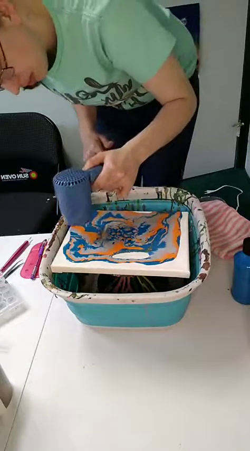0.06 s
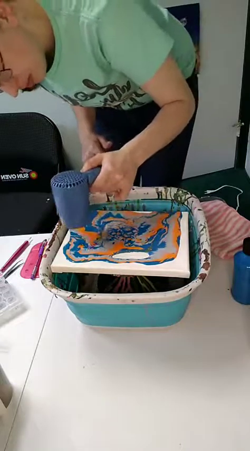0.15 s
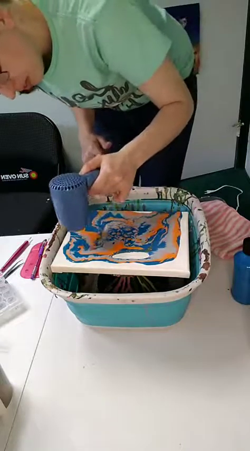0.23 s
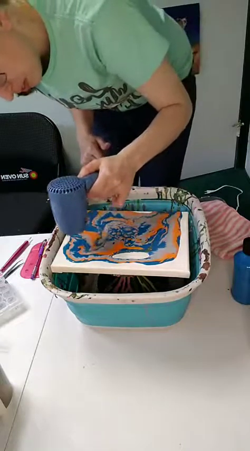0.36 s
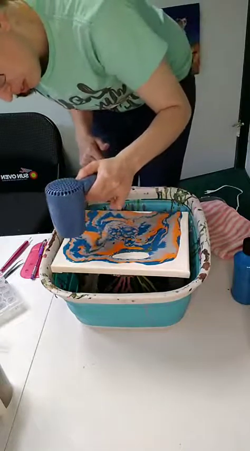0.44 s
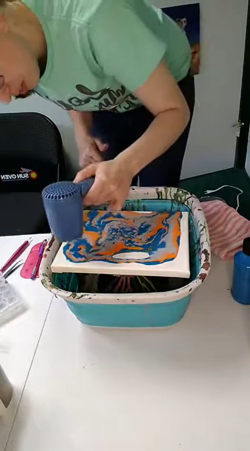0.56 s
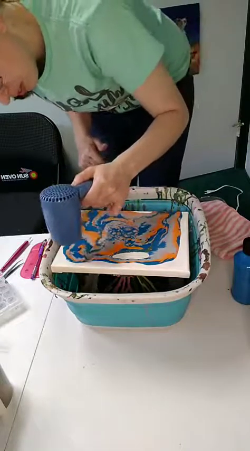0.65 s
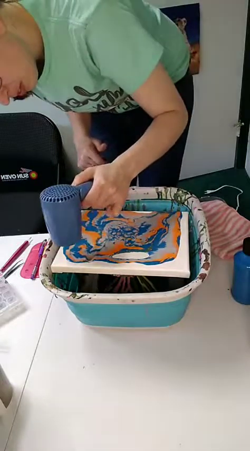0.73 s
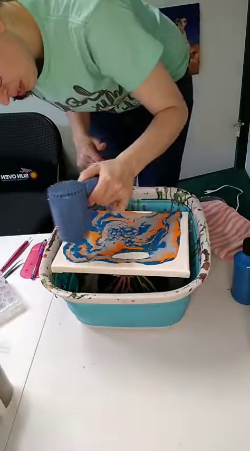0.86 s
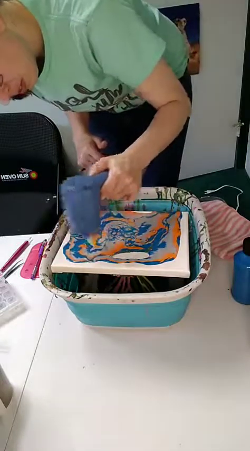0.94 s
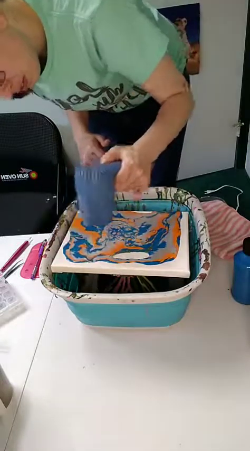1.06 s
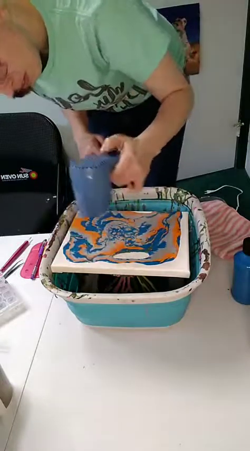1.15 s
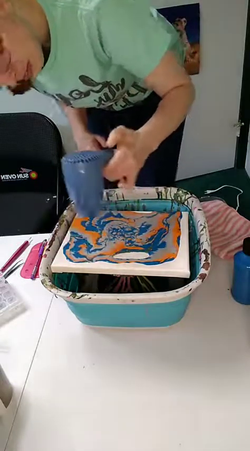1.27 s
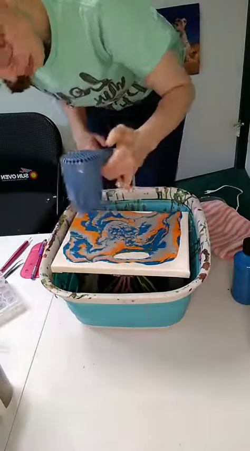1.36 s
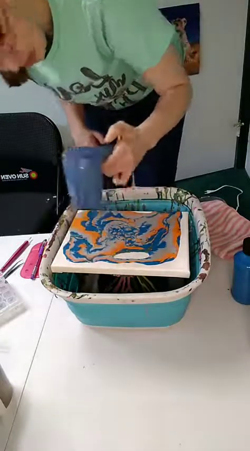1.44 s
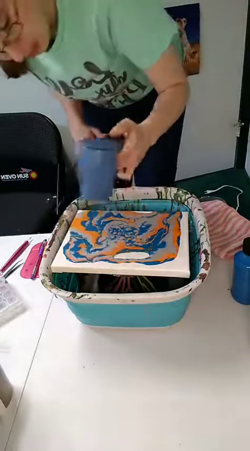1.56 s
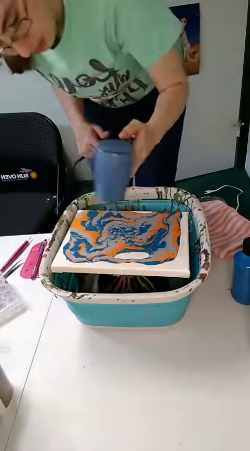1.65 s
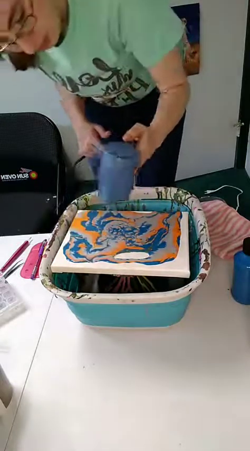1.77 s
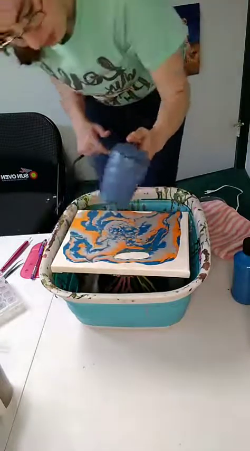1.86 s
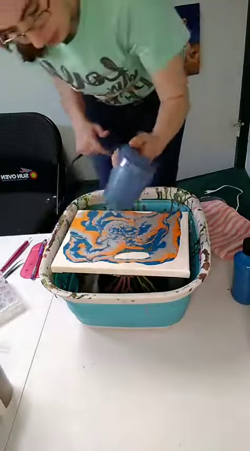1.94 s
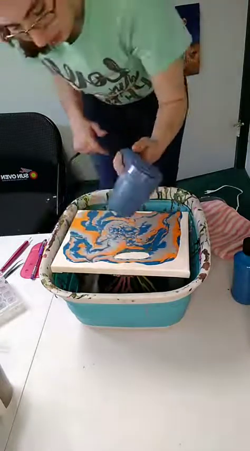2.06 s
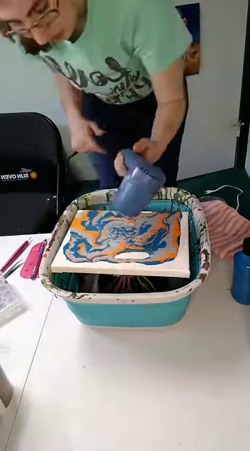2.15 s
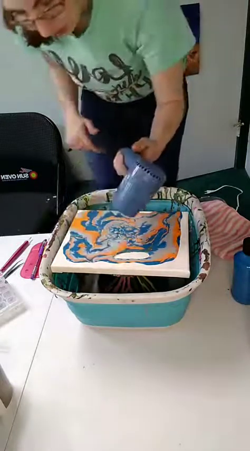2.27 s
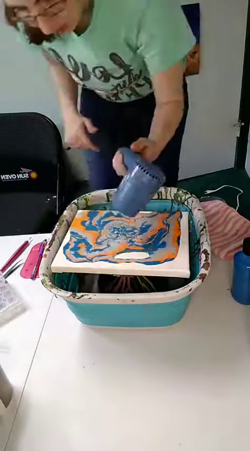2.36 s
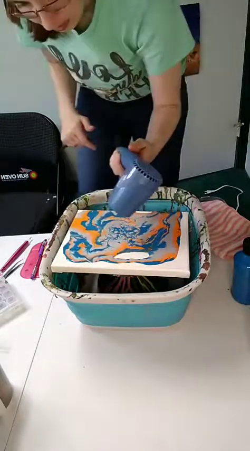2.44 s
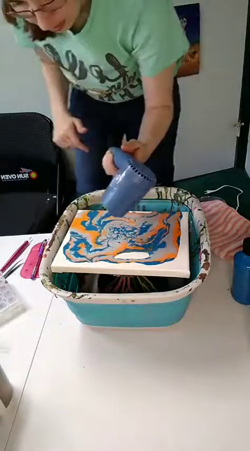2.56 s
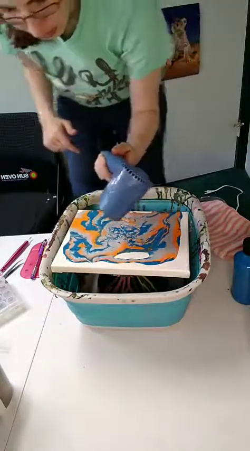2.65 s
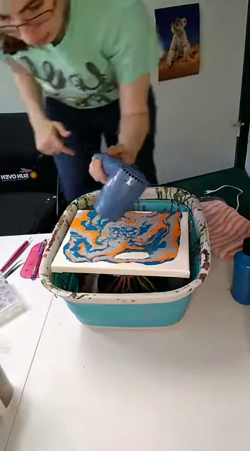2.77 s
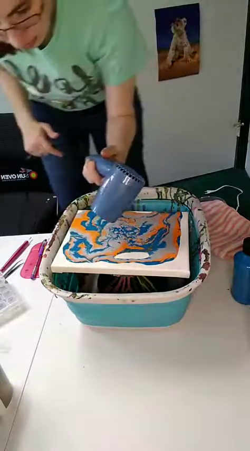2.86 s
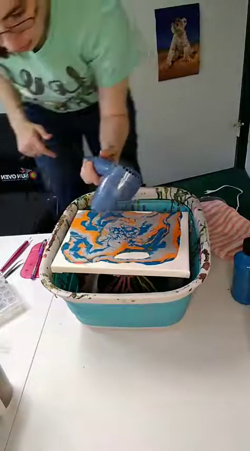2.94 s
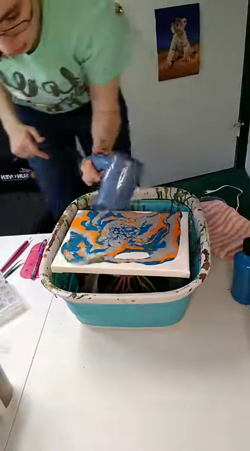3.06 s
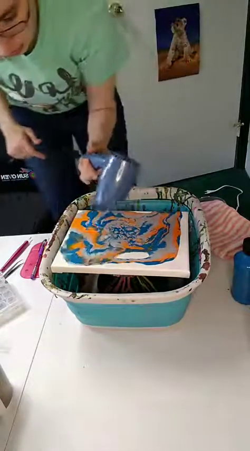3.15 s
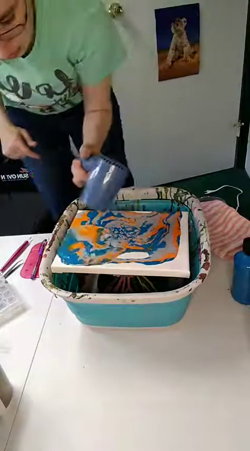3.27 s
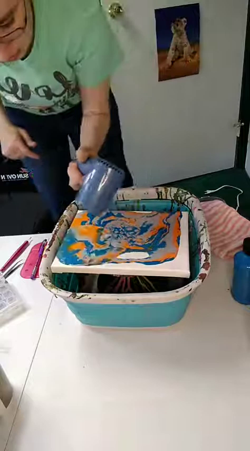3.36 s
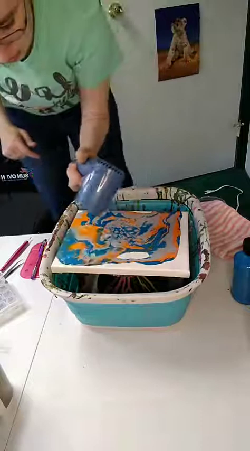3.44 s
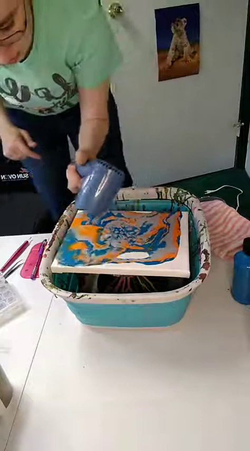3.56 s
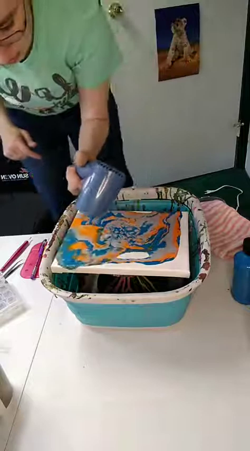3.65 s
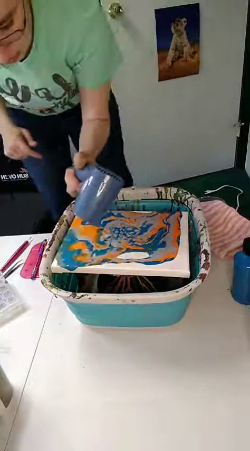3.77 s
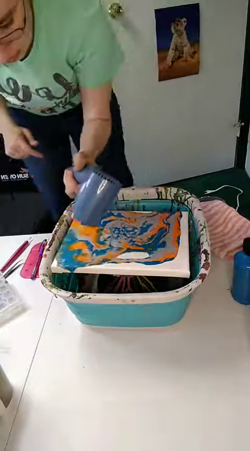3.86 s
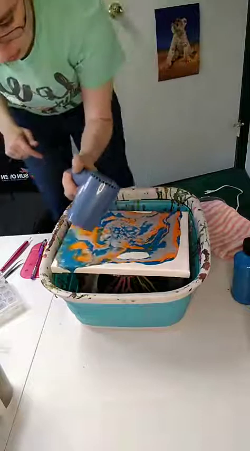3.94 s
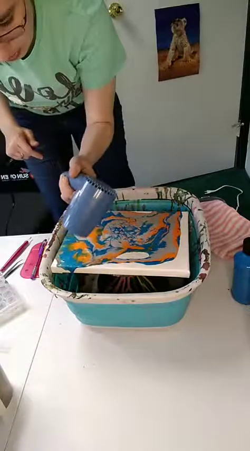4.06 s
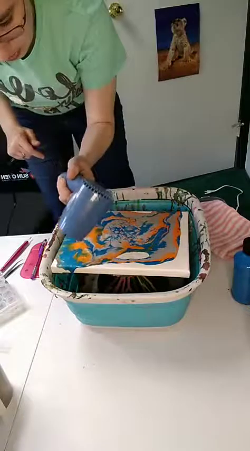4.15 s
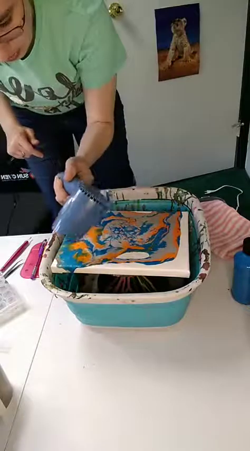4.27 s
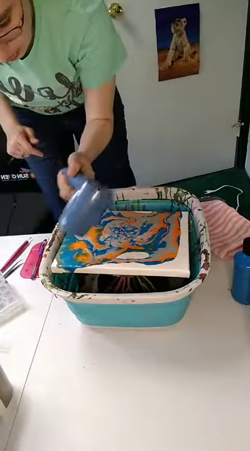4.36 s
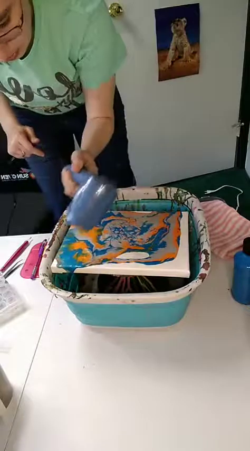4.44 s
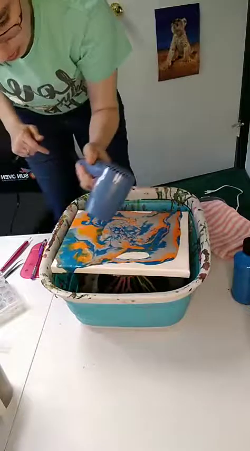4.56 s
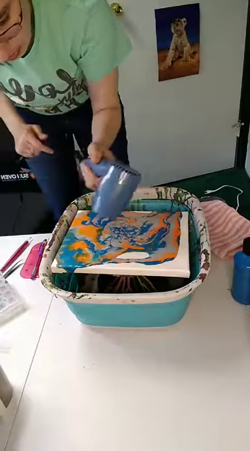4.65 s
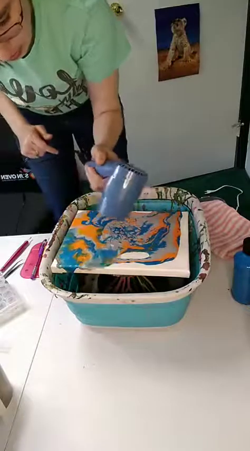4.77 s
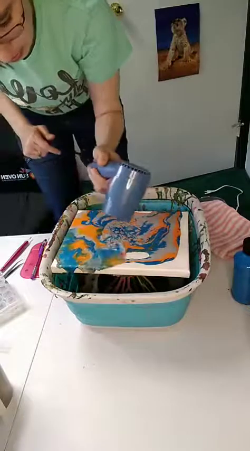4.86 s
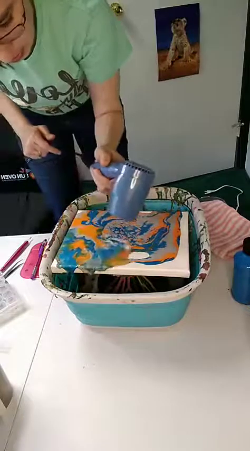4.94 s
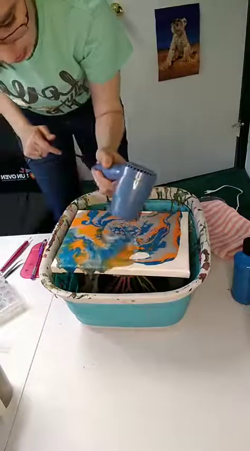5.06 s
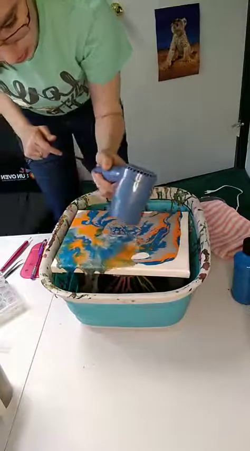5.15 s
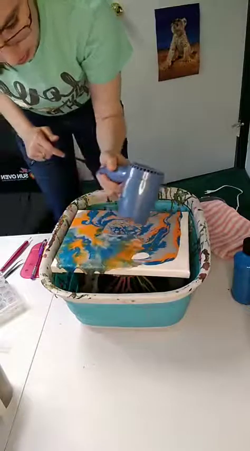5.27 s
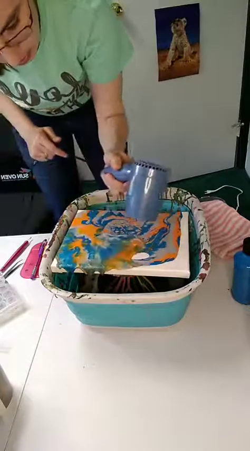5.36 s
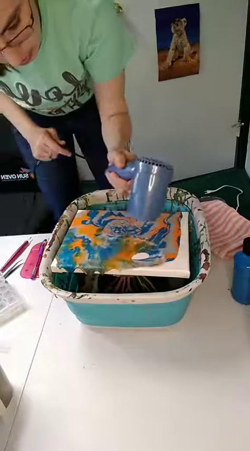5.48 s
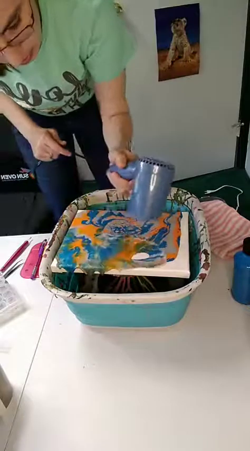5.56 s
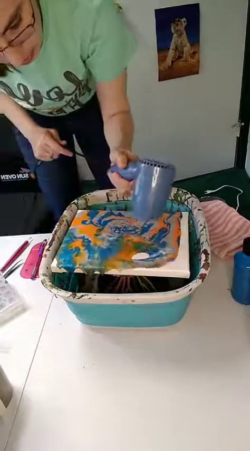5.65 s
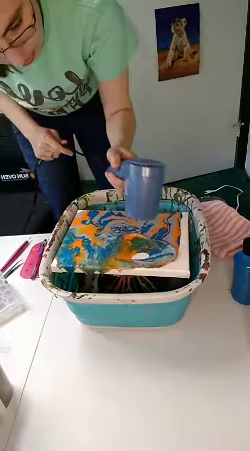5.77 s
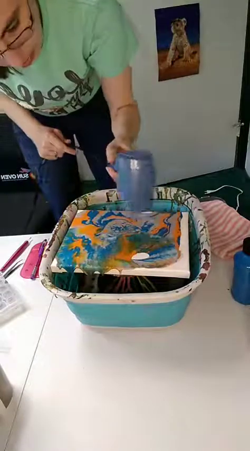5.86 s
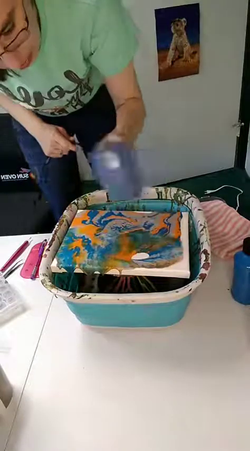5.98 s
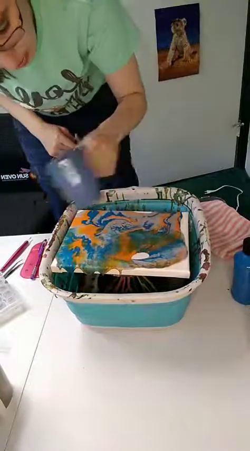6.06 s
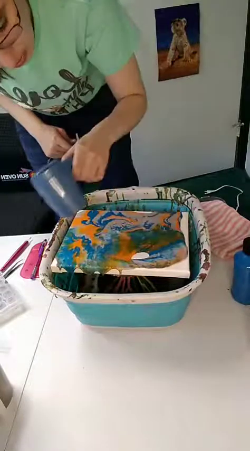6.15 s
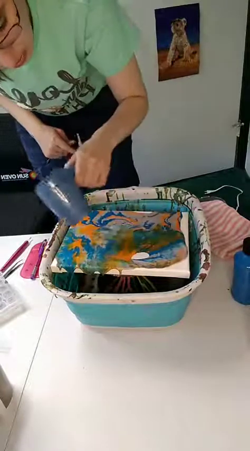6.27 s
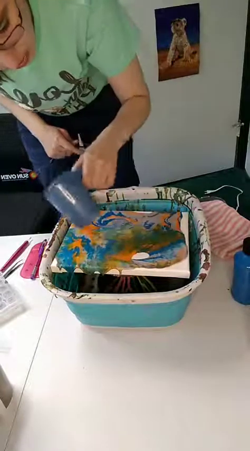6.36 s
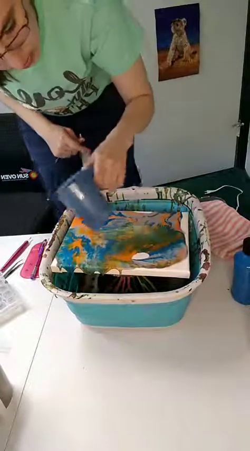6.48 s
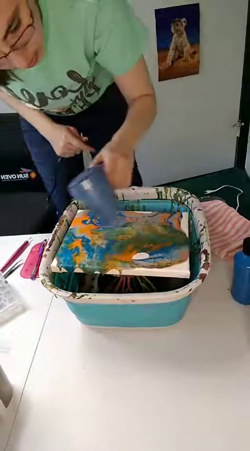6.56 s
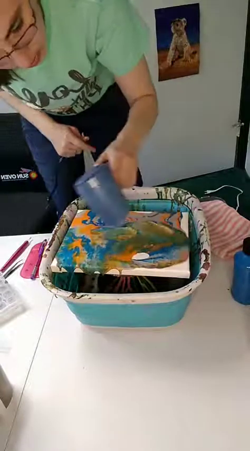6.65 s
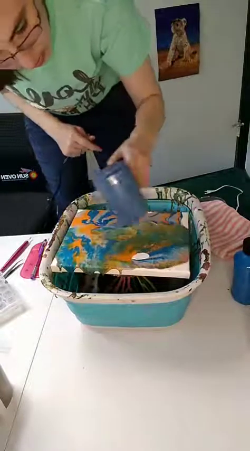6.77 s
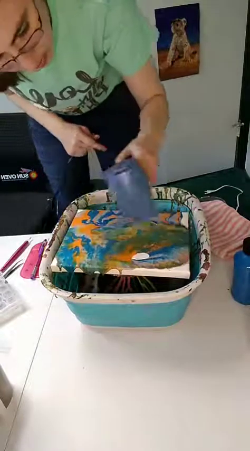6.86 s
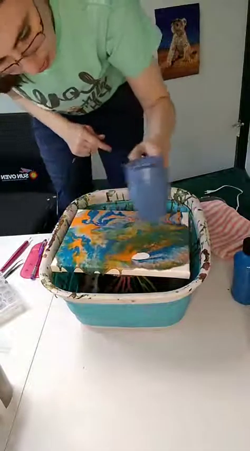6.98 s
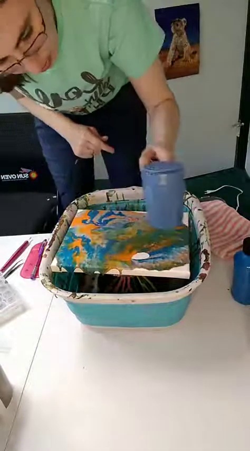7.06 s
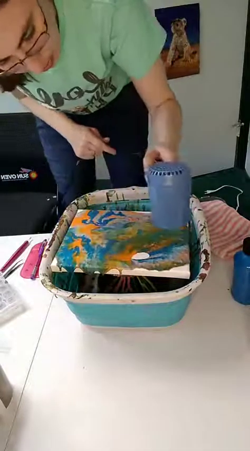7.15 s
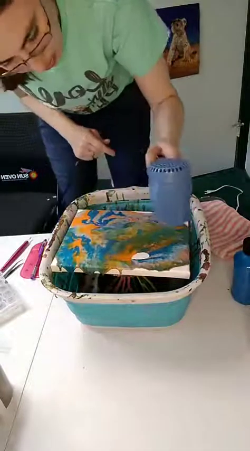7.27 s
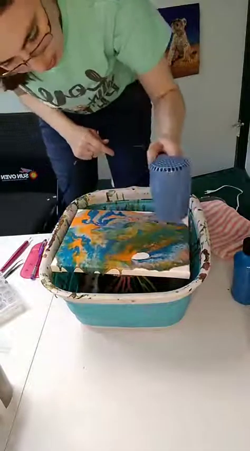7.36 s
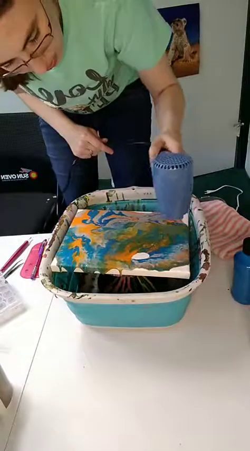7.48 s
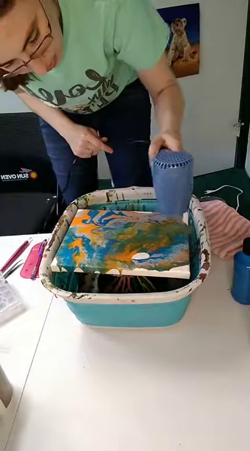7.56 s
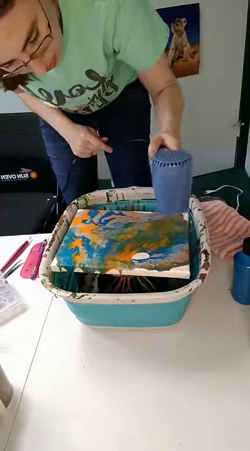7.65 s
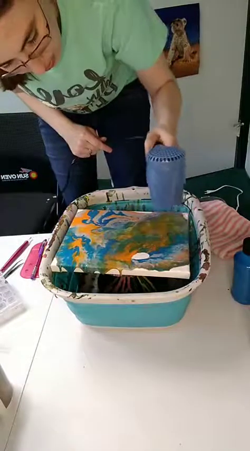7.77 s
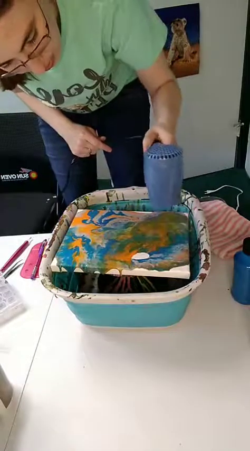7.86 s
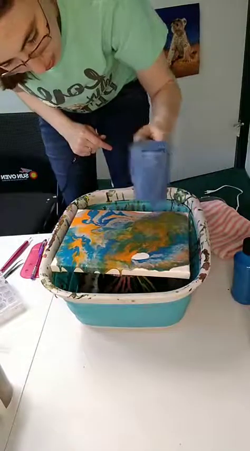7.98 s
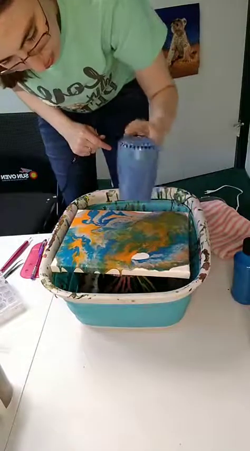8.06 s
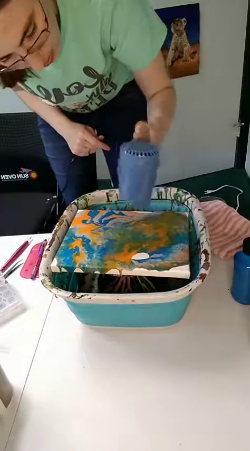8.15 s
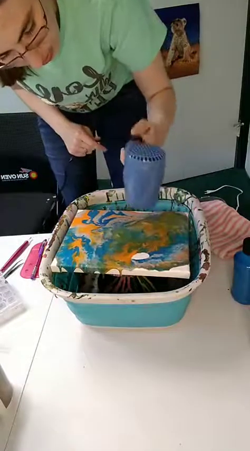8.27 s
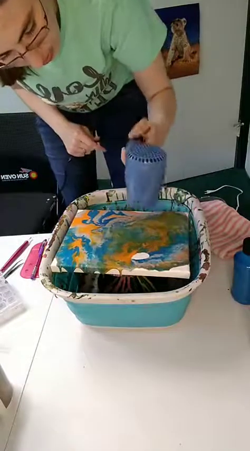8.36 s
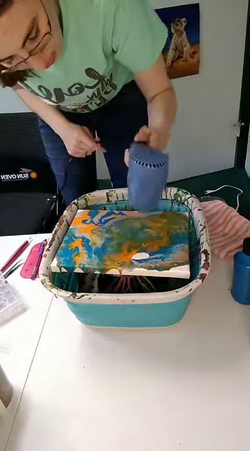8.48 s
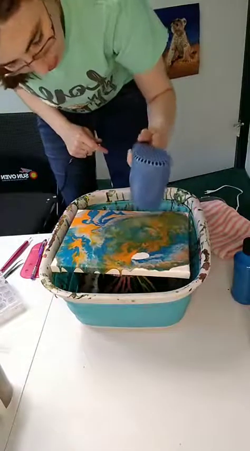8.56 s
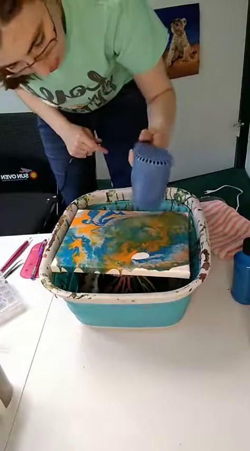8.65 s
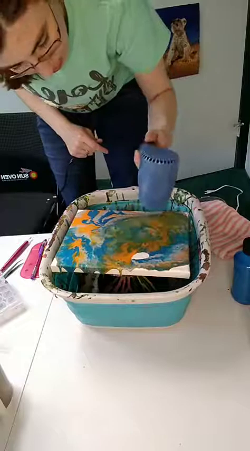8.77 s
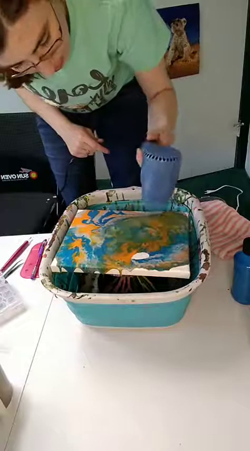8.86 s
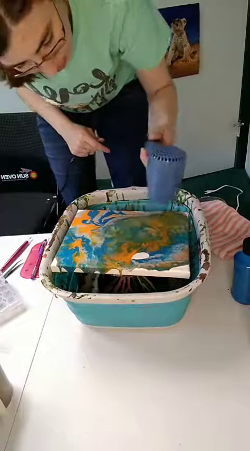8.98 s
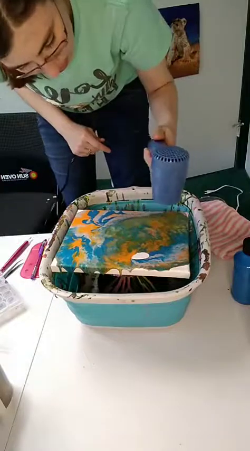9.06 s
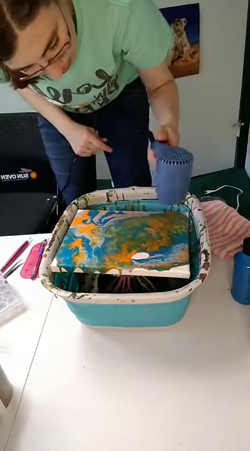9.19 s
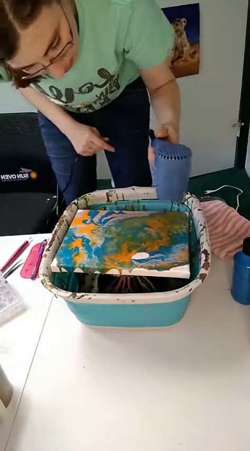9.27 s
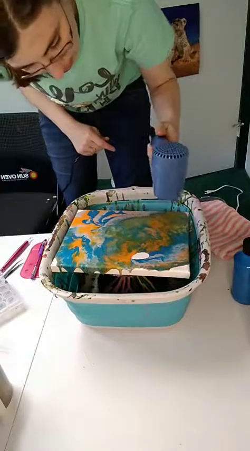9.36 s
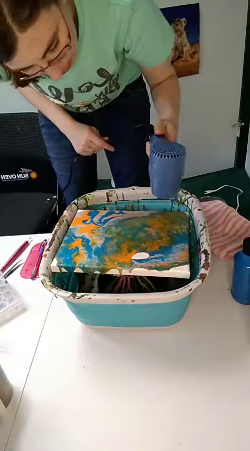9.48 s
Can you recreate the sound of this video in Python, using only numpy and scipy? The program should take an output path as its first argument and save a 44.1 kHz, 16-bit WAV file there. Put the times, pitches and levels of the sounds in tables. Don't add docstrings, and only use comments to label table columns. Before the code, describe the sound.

A handheld blower hums softly on low, clicks off and coasts down, then snaps to a far louder high roar before sinking back to a muffled low level.

```python
import sys
import numpy as np
from scipy import signal
from scipy.fft import rfft, irfft, next_fast_len
from scipy.io import wavfile
from scipy.ndimage import uniform_filter1d, map_coordinates

SR = 44100
rng = np.random.default_rng(int(sys.argv[2]) if len(sys.argv) > 2 else 0)


def output_pcm(signal):
    pcm = np.clip(np.atleast_2d(signal).T, -1, 1) * 32767
    wavfile.write(sys.argv[1], SR, np.round(pcm).astype(np.int16))


def amplitude_ratio(level_db):
    exponent = np.asarray(level_db, float) / 20
    return 10 ** exponent


N = 419832

OFF_S, ON_S = 2.19, 2.74
BAND_EDGES_HZ = [0, 650, 1700, 6500, 20000]
# pitch_hz, level_db (per Hz)
LOW_COLOUR = [(18, -91), (30, -61), (81, -25.5), (303, -22), (327, -17.5), (601, -24.5), (775, -15.5),
              (903, -18.5), (1190, -5.5), (1460, -13.5), (1580, -14.5), (2250, -17.5), (4040, -15.5),
              (7820, -36), (13000, -34)]
HIGH_COLOUR = [(18, -75), (30, -34), (295, -17), (327, -17), (601, -23), (775, -13.5), (880, -15),
               (1190, -3), (1390, -9.5), (2900, -6), (3470, -10), (3940, -6), (7250, -16.5), (8020, -15),
               (13000, -17)]
WORN_COLOUR = [(18, -78), (30, -51), (81, -25), (192, -29), (466, -10), (756, -29.5), (1020, -14),
               (1460, -7), (2090, -11), (2690, -11), (3650, -11.5), (3940, -8), (7250, -16.5), (8020, -14),
               (13000, -16)]
HELD_COLOUR = [(18, -67), (30, -41), (75, -32), (131, -19.5), (335, -11), (362, -18), (491, -5.5),
               (665, -31.5), (999, 2), (1430, -3), (1620, -11), (1750, -35), (2310, -23), (2490, -27),
               (13000, -39)]
# pitch_hz, width_hz, level_db
LOW_MODES = [(336, 46, -25), (776, 86, -24.5), (1134, 44, -8.5), (1227, 44, -6), (1318, 67, -10),
             (1557, 68, -14.5), (2405, 29, -15), (2860, 390, -19.5), (4080, 250, -20)]
HIGH_MODES = [(338, 18, -15), (425, 200, -17.5), (769, 43, -14), (1200, 102, -4.5), (1325, 60, -5.5),
              (1460, 74, -8.5), (1663, 22, -8), (1786, 55, -8.5), (2243, 40, -5.5), (2580, 33, -9.5),
              (2920, 39, -6.5), (4250, 170, -10.5)]
WORN_MODES = [(460, 70, -30), (1026, 100, -4.5), (1460, 57, -0.5), (2205, 28, -4), (2600, 59, -4),
              (2880, 680, -7), (4260, 84, -7)]
# time_s, low_share, high_share, worn_share
COLOUR_SHARES = [
    (0, 1, 0.017, 0),
    (2.74, 0.78, 0.1, 0.094),
    (2.77, 0.048, 0.99, 0),
    (6.8, 0.035, 0.92, 0.045),
    (7.3, 0.041, 0.092, 0.96),
    (8.02, 0, 0.06, 0.88),
    (8.1, 0.17, 0.65, 0.18),
    (8.5, 0.034, 0.52, 0.49),
    (8.75, 0.67, 0.016, 0.043),
    (9.52, 0.46, 0.017, 0.13),
]
# time_s, depth_db
PATCH_DEPTH = [(0, 1.5), (.5, 1), (2.2, 1.5), (2.6, 1.5), (3, 0.5), (6.5, 2), (7.2, 2.5), (8.4, 2.5),
               (8.65, 1.2), (9.52, 1.2)]
# time_s, level_db
AIR_LEVEL = [(0, -43), (2.2, -43.5), (2.26, -48.5), (2.62, -70.5), (2.7, -80), (2.78, -53.5), (2.81, -38),
             (2.85, -31.5), (2.89, -27), (3.06, -21.5), (3.5, -20), (5.9, -20), (6.9, -21), (7.95, -25.5),
             (8.1, -27.5), (8.5, -28), (8.62, -38.5), (8.8, -46.5), (9.52, -45.5)]
# rumble_db, duct_db, jet_db, hiss_db
BAND_BALANCE = [
    (-18, 1.5, 0, -8.5),
    (-20, -3, 0, -6),
    (-19.5, -4, 0.0042, -6.5),
    (-9.5, 3.5, 0, -9.5),
]
COAST_LINGER = [33, 21, -2, 4]
BAND_DRIFT = [0.4, 0.3, 0.3, 0.2]
# start_s, rate_db_per_s, most_db
BAND_WEAR = [
    (5.46, 3, 1.5),
    (6.79, 9, 4),
    (6, 0, 0),
    (6.04, 8, 4),
]
SPIN_UP_BALANCE = [-1, 4, -2, -14]
SPIN_UP_BALANCE_S = 0.075
# time_s, nearness_db
NEARNESS = [(2.9, 1.5), (3.3, 1), (3.6, 0), (3.9, -0.5), (4.2, -0.5), (4.6, 0), (4.9, 1.5), (5.2, -0.5),
            (5.6, 1), (5.85, -0.5), (6.05, 1.5), (6.35, 0), (6.6, 1), (6.85, 0.5), (7.1, 1), (7.5, 0.8),
            (8, -3.5), (8.5, -3)]
NEARNESS_GAIN = [0.59, 0.55, 0.23, 0.05]
# time_s, half_length_s, pitch_hz, width_octaves,
# level_db
BITES = [(3.2, 0.23, 110, 1.6, 6), (4.2, .15, 80, 1.5, -8), (4.65, 0.11, 160, 2.6, 4.5),
         (5.1, .2, 89, 1.5, 7), (6.25, .3, 110, 1.5, -4), (6.05, 0.065, 1220, 0.28, 4),
         (6.45, 0.12, 1150, 0.25, 3), (6.68, 0.097, 1070, .4, -3.5), (7.42, 0.18, 980, .3, -6.5),
         (7.55, .06, 280, 1.6, 9), (4.65, .15, 1900, .5, 1), (4.65, .1, 330, .4, 7),
         (6.3, .25, 700, 0.36, 3), (7.03, .06, 760, .4, -7), (7.4, .3, 770, .4, -4.5),
         (7.05, .06, 250, .8, -7), (7.27, .04, 320, .8, -5), (8.8, .06, 310, 0.89, -4),
         (7.65, .04, 500, .7, -3), (7.62, 0.11, 1600, 0.27, 3), (7.85, .1, 1500, .3, 1),
         (7.08, 0.16, 1270, .35, 5), (7.55, .2, 1180, 0.22, -3), (7.82, 0.071, 3700, 0.35, -4.5),
         (8.15, 0.17, 6100, .5, -4.5), (8.3, 0.22, 800, .4, 3.5), (6.7, 0.09, 4800, .5, 1),
         (11, .15, 160, .8, 4), (2.5, .1, 1100, .4, -3), (2.08, .1, 1180, .15, -5),
         (7.3, .06, 1040, .9, -3), (7.52, .04, 480, .8, 3.5), (7.7, .06, 990, .3, -3),
        (7.2, .05, 950, 0.66, 4), (8.07, .05, 300, 1.3, -4), (7.67, 0.065, 4700, 0.65, 5),
        (6.6, .07, 1060, .5, -4), (8.86, .05, 170, 1.2, 6), (2.62, .07, 1500, 1.4, -4),
        (2.82, .035, 1400, 1.2, -4), (4.05, .07, 8000, .3, -4), (7.36, .05, 270, .6, 5),
        (7.75, .06, 330, 0.88, 2.5), (4.6, .1, 4400, .2, 1.5), (6.13, .07, 1500, .5, -2),
        (3.66, .1, 1500, .4, -1.5), (3.17, .1, 1100, .4, 2), (6.43, .06, 200, 1.2, 5),
        (8.12, .08, 9000, .8, 2)]
# pitch_hz, level_db
MICROPHONE = [(20, -14), (45, -11), (90, -0.5), (6700, -0.5), (7000, -0.5), (7900, -1.5), (8800, -0.5),
              (9200, 3), (13000, 1)]
# time_s, pitch_hz, width_hz, level_db, half_length_s
FLARES = [(0.05, 1160, 90, -32.5, 0.022), (0.208, 1135, 70, -37, .04), (0.203, 1212, 30, -35.5, 0.036),
          (.235, 355, 90, -58, .03), (.81, 335, 70, -57, .035), (.2, 755, 200, -48, 0.026),
          (0.362, 800, 220, -49, 0.03), (5.99, 1230, 140, -26, .02), (6.33, 1170, 100, -26, .025),
          (7.51, 1480, 120, -30, .035), (7.69, 1480, 120, -31, .04), (7.7, 4300, 250, -33, .04),
          (7.87, 2650, 260, -30, .03), (7.94, 2600, 260, -33, .03), (8.015, 1040, 150, -30, .02),
          (8.107, 1200, 200, -27, 0.035), (8.3, 1700, 200, -35, .02), (8.308, 1260, 150, -24, 0.02),
          (8.34, 2600, 300, -28.5, 0.041), (8.49, 2600, 200, -36, .015), (8.49, 4200, 800, -26.5, 0.045)]

# time_s, pitch_hz
BLADE_RATE = [
    (3.9, 1936),
    (4.4, 1932),
    (5.9, 1932),
    (6.1, 1928),
    (6.3, 1929.5),
    (7, 1927),
]
SPIN_S, SPIN_GAP_HZ, SPIN_TAU_S = 2.9, 390, .13
# start_s, length_s, level_db
LOW_BEAMS = [
    [(3.85, .1, -33), (4.45, 0.27, -30.5), (4.85, 0.57, -30), (5.92, 0.15, -31), (6.15, 0.36, -26),
     (6.75, 0.17, -31), (6.52, .1, -33), (7.2, 0.4, -37), (7.76, .12, -38)],
    [(2.94, .1, -31), (3.04, .05, -31), (3.09, .06, -36), (3.15, .1, -31), (3.25, .16, -32.5),
     (3.47, .1, -38), (3.55, 0.4, -29), (4.12, 0.34, -33.5), (4.7, 0.48, -35.5), (5.45, .48, -28.5),
     (5.95, 0.2, -27.5), (6.27, .08, -31), (6.45, .19, -29), (6.77, 0.27, -31), (7.07, 0.28, -34),
     (7.38, .07, -32), (7.5, 0.24, -35), (7.93, 0.28, -28.5), (8.22, 0.45, -36)],
]
HIGH_BEAMS = [
    [(4.22, 0.12, -35), (4.58, 0.17, -32), (5.1, .07, -34), (5.3, .07, -38), (6.17, 0.2, -33),
     (6.56, 0.16, -32), (6.8, .08, -39), (6.96, 0.11, -37), (7.29, 0.06, -35)],
    [(3.07, 0.24, -37), (3.4, 0.11, -46), (3.53, 0.44, -35), (4.1, 0.29, -33), (4.46, 0.076, -37),
     (4.7, 0.22, -37), (4.92, 0.31, -33), (5.33, 0.22, -38), (5.56, 0.2, -31), (5.86, 0.18, -36.5),
     (6.12, .06, -41), (6.24, .14, -37), (6.41, .11, -38), (6.56, 0.085, -42), (6.71, .06, -44),
     (6.83, 0.095, -35.5), (6.96, .08, -40), (7.17, .12, -32), (7.5, 0.16, -33.5), (7.72, .07, -39),
     (7.81, .22, -40.5), (8.36, 0.17, -48)],
]
BETWEEN_BEAMS = [-50, -44, -49, -60]
FADE_S, STOP_S = 0.022, 8.56
FLICKER_DB, ARCH_DB = 1.5, 3
FIRST_RATE_HZ, TOP_HZ = 16000, 13085

# time_s, level_db
HUM = [(0, -43.5), (.55, -43), (1, -44), (1.25, -42), (1.4, -44), (1.7, -41.5), (1.95, -44), (2.03, -56),
       (2.14, -40), (2.2, -46), (2.225, -60), (2.42, -66), (2.48, -88)]
HUM_HZ, COAST_S = 1201, .47
BEADS_DB, WAVER_HZ = 1.2, 6
BEAT_HZ, BEAT_DB = 22, 2
# time_s, level_db
WHINE = [
    (2.46, -95),
    (2.486, -56),
    (2.53, -60),
    (2.6, -65),
    (2.7, -76),
    (2.78, -57),
    (2.82, -62),
    (2.85, -95),
]
WHINE_HZ = 938
# time_s, level_db
COAST_WHISTLE = [
    (2.3, -90),
    (2.45, -76),
    (2.6, -82),
    (2.7, -86),
    (2.72, -110),
]
COAST_WHISTLE_HZ = 4230

# time_s, peak_db, decay_s (to fall 60 dB)
SWITCH = [
    (2.384, -41, 0.17),
    (2.719, -43, 0.078),
    (2.7228, -33.5, 0.19),
]
# pitch_hz, level_db (per Hz)
SNAP_COLOUR = [(180, -73), (300, -45), (1060, -13), (1220, -11), (3980, -17), (4590, -4), (5460, -10),
               (7030, -13), (7850, -23), (9480, -13), (13000, -17)]
CRACK_DB, CRACK_S = -4, .012
# time_s, level_db, pitch_hz, width_hz, half_length_s
THUDS = [
    (2.64, -60.5, 145, 150, 0.03),
    (9.045, -64, 85, 45, 0.03),
    (9.26, -61.5, 78, 45, 0.035),
]

# pitch_hz, level_db
DRONE = [
    (272, -71),
    (335, -70),
]
DRONE_S = 8.7
# pitch_hz, level_db (per Hz)
ROOM_COLOUR = [(8, -6), (30, -4), (50, 0), (90, -6), (200, -30), (400, -120)]
ROOM_DB = -90
TREBLE_BINS = [196, 216, 240, 264, 292, 320, 352, 384, 416, 448, 480, 512, 544, 576, 608]
# pitch_hz, level_db (against the band), share of frames
APART = [(4300, -6, .45), (5000, -4, .8), (6500, -2.5, .84), (7300, -4, .76), (8600, -4, .72),
         (9500, -2.5, .88), (12500, -4.5, .8)]
FIRST_FRAME = 509


def unit(x):
    return x / np.sqrt(np.mean(x ** 2, axis=-1, keepdims=True) + 1e-20)


def along(points, hz):
    f, v = np.transpose(points)
    return np.interp(np.log(hz + 1), np.log(f + 1), v)


def curves(rows):
    s, *columns = np.transpose(rows)
    return [np.interp(np.arange(N) / SR, s, column) for column in columns]


def wobble(rate):
    steps = np.arange(0, N + 64, 64)
    knots = rng.standard_normal(int(N * rate / SR) + 4)
    return np.interp(np.arange(N), steps, map_coordinates(knots, [steps * rate / SR]))


def filtered(x, response):
    m = next_fast_len(N + 8192)
    return irfft(rfft(x, m) * response(np.fft.rfftfreq(m, 1 / SR)), m)[..., :N]


def narrow_noise(noise, centre_hz, width_hz):
    return unit(filtered(noise, lambda hz: np.exp(-(2 * (hz - centre_hz) / width_hz) ** 2)))


def tone(hz, db, order=1):
    phase = 2 * np.pi * np.cumsum(hz * np.ones(N)) / SR
    level = np.sqrt(2) * amplitude_ratio(db + 1.3 * wobble(14))
    return level * np.sin(order * phase + .35 * wobble(25))


def airflow():
    t = np.arange(N) / SR
    low, high, worn = np.clip(curves(COLOUR_SHARES), 0, 1)
    held = np.clip(1 - low - high - worn, 0, 1)
    colours = [turbulence(LOW_COLOUR, LOW_MODES, 6.6), turbulence(HIGH_COLOUR, HIGH_MODES, 4.8),
               turbulence(WORN_COLOUR, WORN_MODES, 3.2), turbulence(HELD_COLOUR, [], 0)]
    mix = 0
    for share, db, colour in zip((low, high, worn, held), np.array(BAND_BALANCE), colours):
        mix = mix + np.sqrt(share) * amplitude_ratio(db)[:, None] * colour
    flutter_db = np.array([.8 * wobble(9), .6 * wobble(9), .45 * wobble(13), 1.6 * wobble(40)])
    flutter_db = flutter_db + .3 * wobble(16)
    drift_db = np.array([w * wobble(7) for w in BAND_DRIFT]) * curves(PATCH_DEPTH)[0] * worn
    shape_db = np.outer(COAST_LINGER, np.clip(t - OFF_S, 0, None) * (t < ON_S))
    shape_db -= [np.clip(rate * (t - s), 0, abs(most)) * high for s, rate, most in BAND_WEAR]
    shape_db += np.outer(NEARNESS_GAIN, curves(NEARNESS)[0] * (t >= ON_S))
    shape_db += np.outer(SPIN_UP_BALANCE, (t >= ON_S) * np.exp(-abs(t - ON_S) / SPIN_UP_BALANCE_S))
    level_db = curves(AIR_LEVEL)[0] + shape_db + flutter_db + drift_db
    return np.sum(amplitude_ratio(level_db) * mix, axis=0)


def turbulence(spectrum, modes, under_db):
    hz = np.fft.rfftfreq(N, 1 / SR)
    power = amplitude_ratio(2 * (along(spectrum, hz) - under_db))
    for centre_hz, width_hz, db in modes:
        power = power + amplitude_ratio(2 * db) / (1 + (2 * (hz - centre_hz) / width_hz) ** 2) ** 2
    z = rfft(patchy_noise()) * np.sqrt(power)
    above = [.5 + .5 * np.tanh(9 * np.log((hz + 1) / (edge + 1e-9))) for edge in BAND_EDGES_HZ]
    return unit(irfft([z * np.sqrt(abs(a - b)) for a, b in zip(above, above[1:])], N))


def patchy_noise():
    _, t, z = signal.stft(rng.standard_normal(N), SR, nperseg=1024)
    field = uniform_filter1d(rng.standard_normal(z.shape), size=8, axis=1)
    field = uniform_filter1d(field, size=4, axis=0)
    field = field / np.sqrt(np.mean(field ** 2) + 1e-20)
    depth_db = np.interp(t, *np.transpose(PATCH_DEPTH))
    gain = amplitude_ratio(depth_db * field - np.log(10) / 20 * depth_db ** 2)
    return signal.istft(z * gain, SR, nperseg=1024)[1][:N]


def bitten(x):
    hz, t, z = signal.stft(x, SR, nperseg=2048, noverlap=1536)
    octave = np.log2(hz + 1)[:, None]
    gain_db = 0
    for s, half, centre_hz, wide, db in BITES:
        in_time = np.exp(-((t - s) / half) ** 2)
        in_pitch = np.exp(-(2 * (octave - np.log2(centre_hz)) / wide) ** 2)
        gain_db = gain_db + db * in_time * in_pitch
    return signal.istft(z * amplitude_ratio(gain_db), SR, nperseg=2048, noverlap=1536)[1][:N]


def flares():
    t, noise = np.arange(N) / SR, rng.standard_normal(N)
    out = np.zeros(N)
    for s, centre_hz, width_hz, db, half in FLARES:
        out += amplitude_ratio(db) * np.exp(-((t - s) / half) ** 2) * narrow_noise(noise, centre_hz, width_hz)
    return out


def blades():
    t = np.arange(N) / SR
    hz = curves(BLADE_RATE)[0] - SPIN_GAP_HZ * np.exp(-np.clip(t - SPIN_S, 0, None) / SPIN_TAU_S)
    orders_db = [beam(rows, db) for rows, db in zip(LOW_BEAMS + HIGH_BEAMS, BETWEEN_BEAMS)]
    turning = np.clip(np.minimum(t - SPIN_S, STOP_S - t) / FADE_S, 0, 1)
    turning = turning * amplitude_ratio(np.minimum(curves(AIR_LEVEL)[0] + 27, 0))
    lines = sum(tone(hz, db, order=k + 1) for k, db in enumerate(orders_db))
    fifth = tone(hz, orders_db[3] - 9, order=5)
    folded_db = orders_db[3] - 1.5 - .12 * (1930 - hz)
    folded = tone(FIRST_RATE_HZ - 4 * hz, folded_db)
    return turning * (lines + fifth + folded)


def beam(rows, faint_db):
    t = np.arange(0, N, 64) / SR
    lifts = []
    for s, length, db in rows:
        arch_db = ARCH_DB * (2 * (t - s) / length - 1) ** 2
        edges = np.clip(np.minimum(t - s, s + length - t) / FADE_S + .5, 0, 1)
        lifts.append((db - faint_db - arch_db) * edges)
    lift_db = np.interp(np.arange(N) / SR, t, np.max(lifts, axis=0))
    return faint_db + lift_db + FLICKER_DB * wobble(9)


def motor():
    t = np.arange(N) / SR
    coasting = np.exp(-np.clip(t - OFF_S, 0, None) / COAST_S)
    beads = wobble(28.2)
    beat_db = BEAT_DB * np.sin(2 * np.pi * BEAT_HZ * t + .8 * np.roll(beads, SR))
    hum_hz = HUM_HZ * coasting + WAVER_HZ * beads[::-1]
    hum = tone(hum_hz, curves(HUM)[0] + BEADS_DB * beads + beat_db)
    whine = tone(WHINE_HZ, curves(WHINE)[0])
    return hum + whine + tone(COAST_WHISTLE_HZ, curves(COAST_WHISTLE)[0])


def handling():
    out, t = np.zeros(N), np.arange(N) / SR
    snap = unit(filtered(rng.standard_normal(N), lambda hz: amplitude_ratio(along(SNAP_COLOUR, hz))))
    for s, db, decay_s in SWITCH:
        tail = (t > s) * amplitude_ratio(db - 8.0 - 60 * abs(t - s) / decay_s)
        crack = amplitude_ratio(CRACK_DB - 60 * abs(t - s) / CRACK_S)
        out += tail * (1 + crack) * snap
    for s, db, centre_hz, width_hz, half in THUDS:
        thud = narrow_noise(rng.standard_normal(N), centre_hz, width_hz)
        out += amplitude_ratio(db) * np.exp(-((t - s) / half) ** 2) * thud
    return out


def drone():
    fade_in = np.clip(np.arange(N) / SR - DRONE_S, 0, .1) * 10
    return sum(tone(hz, db) for hz, db in DRONE) * fade_in


def room():
    rumble = unit(filtered(rng.standard_normal(N), lambda hz: amplitude_ratio(along(ROOM_COLOUR, hz))))
    return amplitude_ratio(ROOM_DB + 2 * wobble(5)) * rumble


def scene():
    air = filtered(bitten(airflow()), lambda hz: amplitude_ratio(along(MICROPHONE, hz)))
    mono = air + flares() + blades() + motor() + handling() + drone() + room()
    return np.tile(mono, (2, 1))


def treble_apart(x):
    hop, lead = 1024, 2048 - FIRST_FRAME
    n, k = np.arange(2 * hop)[:, None], np.arange(TREBLE_BINS[0], TREBLE_BINS[-1])
    window = np.sin(np.pi * (n + .5) / (2 * hop))
    lapped = window * np.cos(np.pi / hop * (n + .5 + hop / 2) * (k + .5))
    padded = np.pad(x[0], (lead, 3 * hop))
    frames = np.lib.stride_tricks.sliding_window_view(padded, 2 * hop)[::hop]
    power = (frames @ lapped) ** 2
    side = rng.standard_normal(power.shape)
    luck = rng.standard_normal((len(TREBLE_BINS), len(frames)))
    luck = luck + 1.2 * rng.standard_normal(len(frames))
    for b, (lo, hi) in enumerate(zip(TREBLE_BINS, TREBLE_BINS[1:])):
        cols, hz = slice(lo - k[0], hi - k[0]), lo * SR / (2 * hop)
        lasting = uniform_filter1d(power[:, cols], size=3, axis=0)
        toneless = lasting.max(axis=1) < 8 * lasting.mean(axis=1)
        db, share = (along([(row[0], row[j]) for row in APART], hz) for j in (1, 2))
        noisy = toneless & (luck[b] < np.quantile(luck[b], np.clip(share, 0, 1)))
        level = amplitude_ratio(db - 0.75 * luck[b]) * np.sqrt(power[:, cols].mean(axis=1))
        side[:, cols] *= (noisy * level)[:, None]
    halves = (side @ lapped.T * 2 / hop).reshape(len(frames), 2, hop)
    apart = (halves[1:, 0] + halves[:-1, 1]).ravel()[lead - hop:][:N]
    return x + [apart, -apart]


def top_cut(x):
    return signal.sosfilt(signal.butter(12, 14370, fs=SR, output="sos"), x)


def record(dry):
    limited = filtered(dry, lambda hz: hz < TOP_HZ)
    mix = treble_apart(limited)
    return top_cut(mix)


dry = scene()
out = record(dry)
output_pcm(out)
```